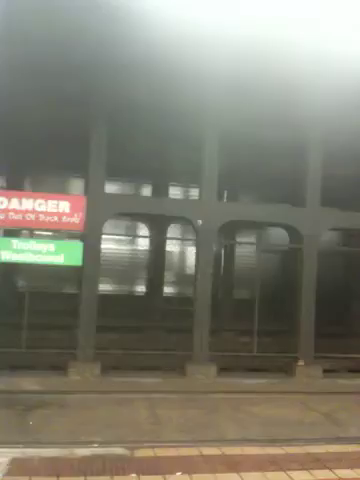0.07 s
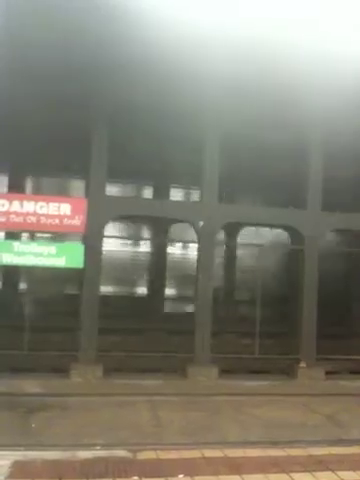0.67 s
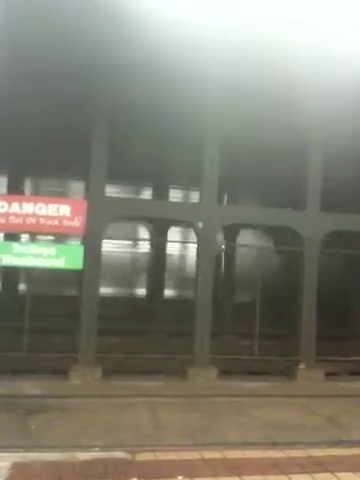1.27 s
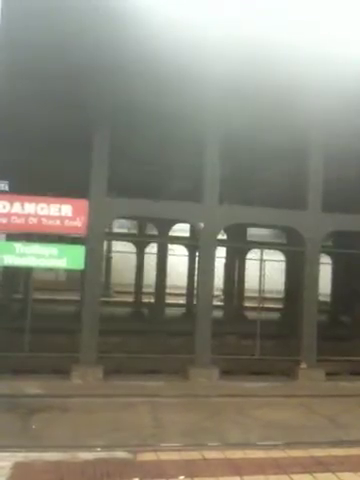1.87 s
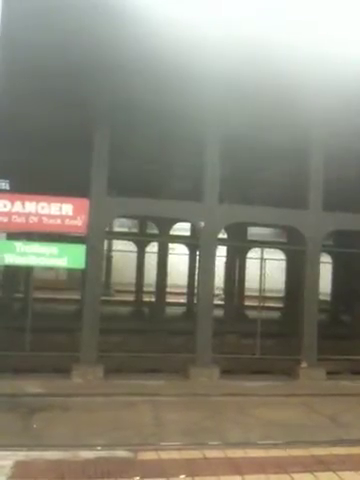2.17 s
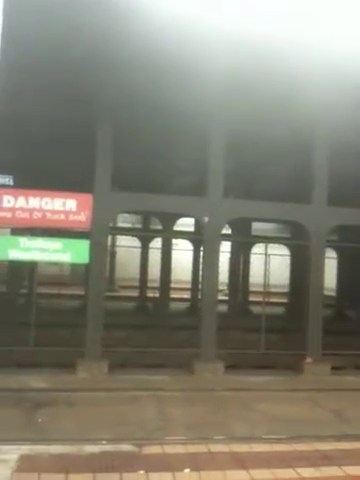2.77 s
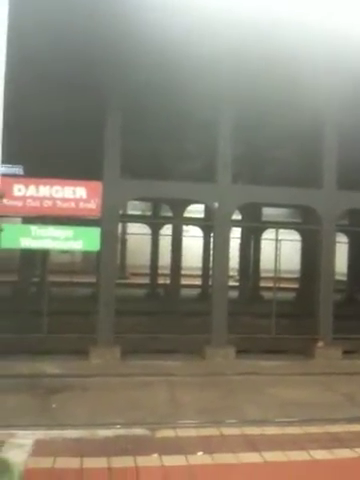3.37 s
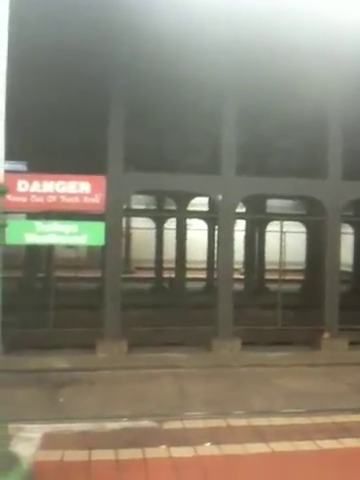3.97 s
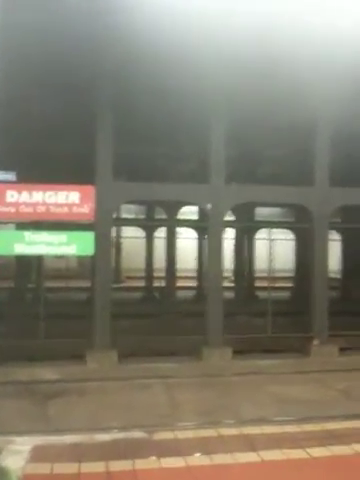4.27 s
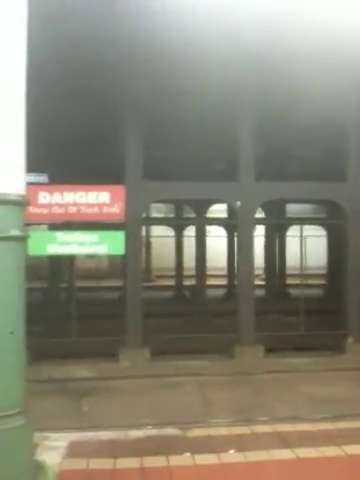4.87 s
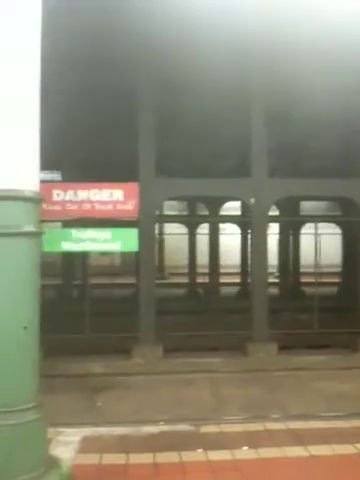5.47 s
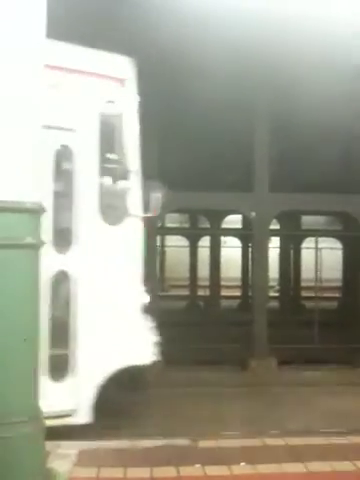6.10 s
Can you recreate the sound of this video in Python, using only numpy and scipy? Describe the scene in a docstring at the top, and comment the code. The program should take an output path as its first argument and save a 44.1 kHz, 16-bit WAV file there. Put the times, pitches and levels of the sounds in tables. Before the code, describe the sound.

A subway train rushes past with a loud, distorted roar of wheels on rails, then fades to a dull rumble.

```python
"""Subway train passing through a station

Rough steel wheels on rails radiate a broad roar with two resonant groups, a boom and a ring.
As the train recedes into the tunnel the treble dies first, uncovering a faint hiss; one dry tick sounds.
The roar overloads a small microphone, whose bass cut and output stage make it a dense, tearing rasp."""
import sys
import numpy as np
from scipy import signal
from scipy.fft import rfft, irfft, next_fast_len
from scipy.io import wavfile
from scipy.ndimage import uniform_filter1d

SR = 44100
rng = np.random.default_rng(int(sys.argv[2]) if len(sys.argv) > 2 else 0)


def inscribe(sig):
    """Save sig as 16-bit PCM at rate SR to the path in sys.argv[1].

    A 1-D sig is mono; a 2-D sig holds one channel per row.
    Samples are clipped to [-1, 1] before scaling.
    """
    pcm = np.round(np.clip(np.atleast_2d(sig).T, -1, 1) * 32767)
    wavfile.write(sys.argv[1], SR, pcm.astype(np.int16))


N = 274963
T = np.arange(N) / SR
FREQ = np.maximum(np.arange(N // 2 + 1) * SR / N, 1)

# rolling noise at 0 dB closeness: (frequency [Hz], spectrum level [dB in 1 Hz])
ROAR_SPECTRUM = [(30, -45), (80, -36), (140, -30), (215, -24.5), (300, -23), (460, -24.5), (740, -26),
                 (1000, -33), (1500, -39), (2600, -44), (4600, -51), (8000, -61.5), (15000, -65.5)]
# fading with distance; the tunnel carries the bass on: (frequency [Hz], slope [dB per dB of closeness])
ROAR_FADE = [(60, 0.35), (130, 0.08), (300, 0.48), (600, 0.66), (1100, 0.6), (2500, 0.87), (8000, 1.7)]
# resonances of track and wheels, low and high: (frequency [Hz], half-width [Hz], level [dB])
BOOM_MODES = [(280.3, 30.6, -4), (327.4, 28, 0), (360.7, 23, 0), (398, 24.6, 0)]
RING_MODES = [(555.6, 9.1, 2.5), (592.4, 65, -3), (767, 33, -12), (1122, 36, -14)]
# brief rises of the boom and of the ring: (time [s], rise [dB])
BOOM_RISES = [(.32, 6), (.46, 7), (0.902, 11.5), (1.42, 9), (1.789, 6), (1.88, 11), (2.35, 3.5), (2.46, 9),
              (3.5, 3), (3.9, 7), (4.53, 6), (4.83, 12.5)]
RING_RISES = [(.86, 5), (1.18, 9), (1.93, 5), (2.08, 5.5), (2.51, 13), (2.93, 7.5), (3.38, 5.5), (3.71, -1),
              (3.85, 7.5), (4.16, 7.5), (4.48, 8), (5.22, 6)]
# spectral peaks of the station's hiss: (frequency [Hz], half-width [Hz], level [dB])
HISS_PEAKS = [(4600, 580, 3), (8000, 4300, -13.5)]


def rolling_roar(closeness_db, flicker_db=.5, flicker_per_s=24.18):
    """Surface roughness excites broadband noise; each octave flickers and attenuates at its own rate."""
    roar = 0
    for hz in 30 * 2 ** np.arange(10):
        octave = np.sqrt(np.maximum(1 - np.abs(np.log2(FREQ / hz)), 0))
        band = octave * amplitude(at_frequency(ROAR_SPECTRUM, FREQ))
        rms = np.sqrt(np.sum(band ** 2) * SR / N)
        noise = rms * shaped_noise(band)
        level_db = at_frequency(ROAR_FADE, hz) * closeness_db + flicker_db * random_walk(flicker_per_s)
        roar += noise * amplitude(level_db)
    return roar


def track_boom(closeness_db):
    """Forced vibration: the low modes of track and wheels boom, with brief surges."""
    level_db = 2 + 0.72 * closeness_db + throb_db(BOOM_RISES, depth_db=1.2)
    return resonant_noise(BOOM_MODES, level_db)


def wheel_ring(closeness_db):
    """Resonance: the wheels ring in higher modes, which fade more slowly than the boom."""
    level_db = -2.5 + 0.42 * closeness_db + throb_db(RING_RISES, depth_db=2)
    return resonant_noise(RING_MODES, level_db)


def dry_tick(time_s=5.4233, level_db=-4.5, decay_s=.00012):
    """An impulse with fast exponential decay is heard as a tiny tick."""
    return amplitude(level_db) * (T >= time_s) * np.exp(-np.abs(T - time_s) / decay_s)


def station_hiss():
    """Masking: this faint steady noise is hidden until the train's treble fades."""
    return resonant_noise(HISS_PEAKS, level_db=-40)


def resonant_noise(modes, level_db):
    """Damped resonances under independent random excitation add in power."""
    power = sum(amplitude(2 * db) / (1 + ((FREQ - hz) / width) ** 2) ** 2 for hz, width, db in modes)
    return shaped_noise(np.sqrt(power)) * amplitude(level_db)


def throb_db(rises, depth_db, rate_per_s=12, rise_s=0.023):
    """Amplitude modulation: a random throb plus brief bell-shaped swells."""
    swells_db = sum(db * np.exp(-((T - time_s) / rise_s) ** 2) for time_s, db in rises)
    return depth_db * random_walk(rate_per_s) + swells_db


def shaped_noise(gain):
    """Filtering gives white noise the spectral shape of the gain; the result has rms 1."""
    size = next_fast_len(N, real=True)
    shape = np.interp(np.arange(size // 2 + 1) * SR / size, FREQ, gain)
    noise = irfft(rfft(rng.standard_normal(size)) * shape, size)[:N]
    return noise / noise.std()


def random_walk(rate_per_s):
    """Averaging held random values twice gives a slow fluctuation with spread near 1."""
    hold = int(SR / rate_per_s)
    steps = np.repeat(rng.standard_normal(N // hold + 1), hold)
    return np.sqrt(2) * uniform_filter1d(uniform_filter1d(steps, hold), hold)[:N]


def saturate(x, ceiling, knee):
    """Saturation: linear when small, flat at the ceiling; a higher knee is a harder corner."""
    return x / (1 + np.abs(x / ceiling) ** knee) ** (1 / knee)


def at_frequency(curve, hz):
    """Interpolation on a logarithmic frequency axis."""
    frequencies, values = np.transpose(curve)
    return np.interp(np.log(hz), np.log(frequencies), values)


def amplitude(db):
    """Amplitude grows tenfold for every 20 dB."""
    return 10 ** (np.asarray(db) / 20)


def scene(clears_s=1.89, fade_db_per_s=6):
    """Superposition: pressures add at the platform, in units of the microphone's overload point."""
    # once the last car clears the platform, the tunnel swallows the sound at a steady rate
    closeness_db = 3 - fade_db_per_s * np.maximum(T - clears_s, 0)
    boom = track_boom(closeness_db)
    ring = wheel_ring(closeness_db)
    return (rolling_roar(closeness_db) + boom + ring + station_hiss())[None]


def record(dry, bass_cut_hz=190, gain_db=-3.0, treble_hz=11500, sizzle_hz=3500, sizzle_db=-17,
           start_s=.12, top_hz=15800):
    """Nonlinear distortion: the microphone clips the peaks and its output stage clips them again."""
    flattened = saturate(dry, ceiling=0.98, knee=32)
    bass_cut = signal.butter(3, bass_cut_hz, "high", fs=SR, output="sos")
    ramps = signal.sosfilt(bass_cut, flattened)  # the flat tops tilt into ramps
    rasp = saturate(ramps * amplitude(gain_db), ceiling=0.66, knee=33)
    # the edges are slightly rounded, and a thin sizzle of treble passes undistorted
    rounded = rfft(rasp) / np.sqrt(1 + (FREQ / treble_hz) ** 4)
    sizzle = rfft(dry) * amplitude(sizzle_db) / (1 + (sizzle_hz / FREQ) ** 2)
    sound = irfft(rounded + sizzle, N) + dry_tick()
    sound *= T >= start_s
    band_limit = signal.ellip(8, .05, 50, top_hz, fs=SR, output="sos")
    return signal.sosfiltfilt(band_limit, sound)


dry = scene()
out = record(dry)
inscribe(out)
```